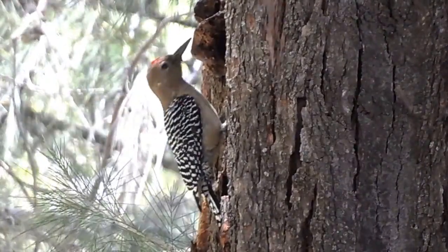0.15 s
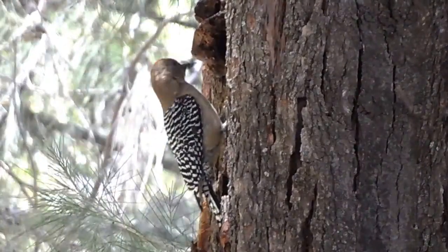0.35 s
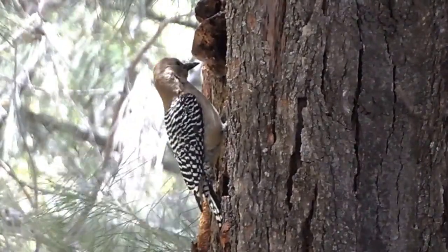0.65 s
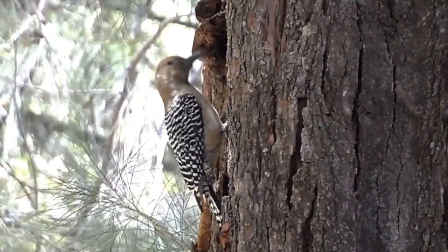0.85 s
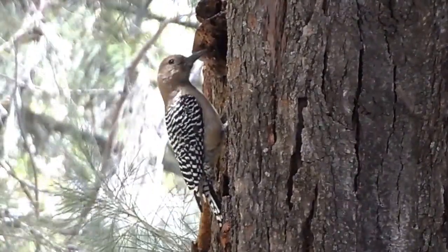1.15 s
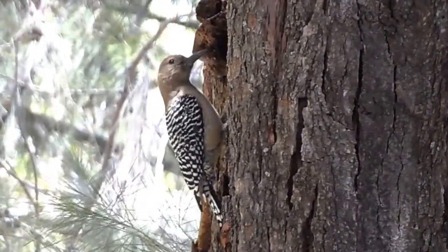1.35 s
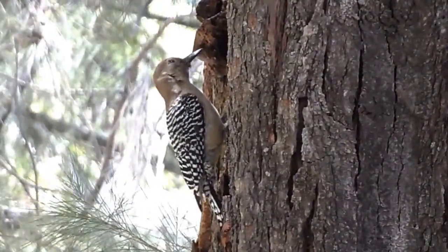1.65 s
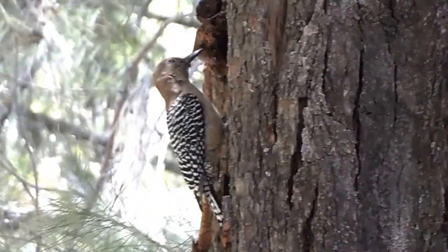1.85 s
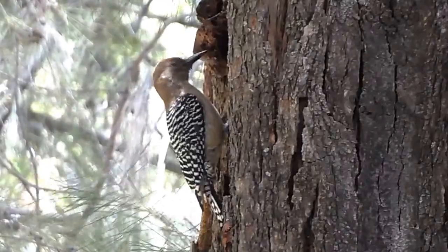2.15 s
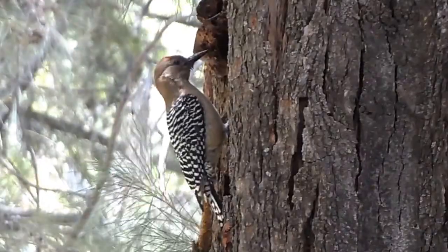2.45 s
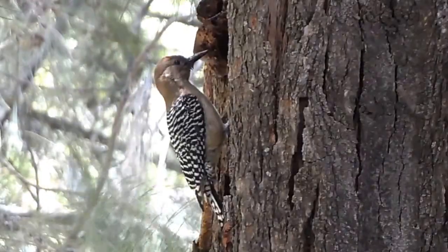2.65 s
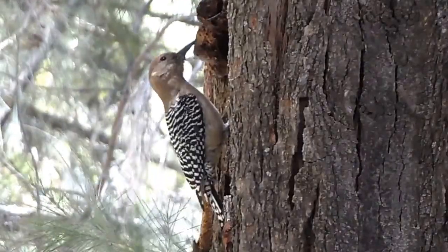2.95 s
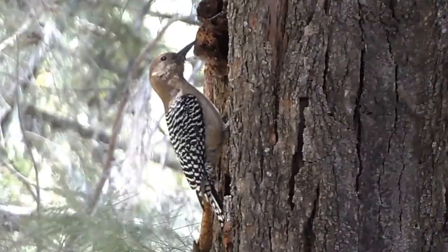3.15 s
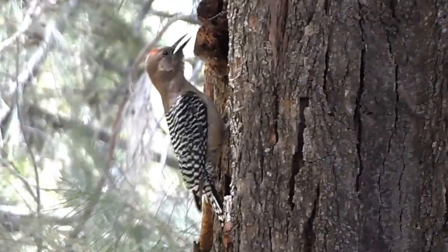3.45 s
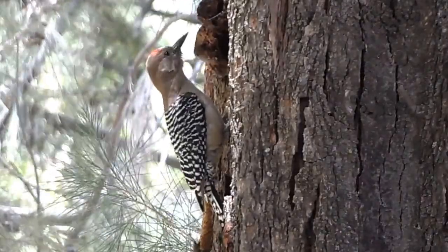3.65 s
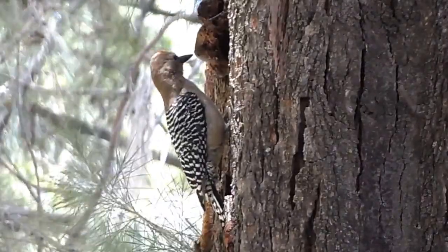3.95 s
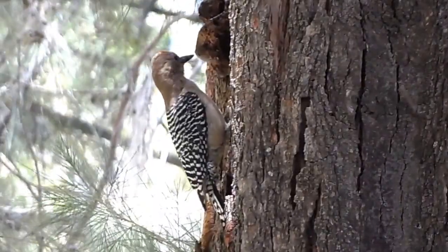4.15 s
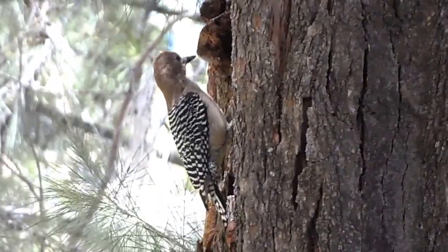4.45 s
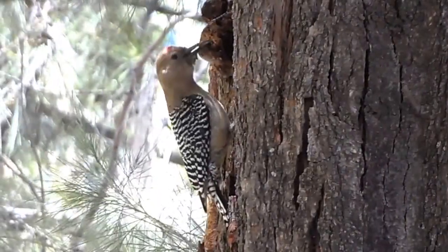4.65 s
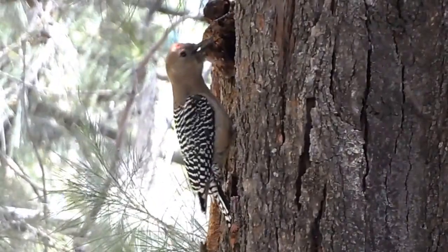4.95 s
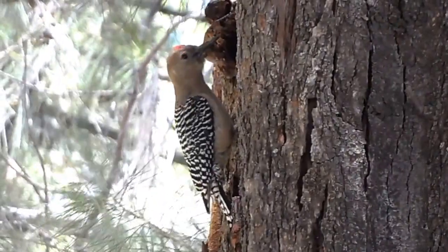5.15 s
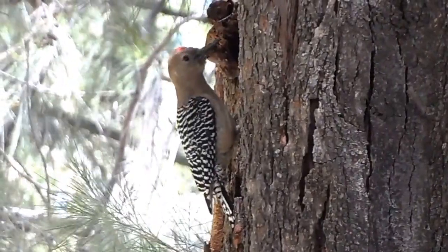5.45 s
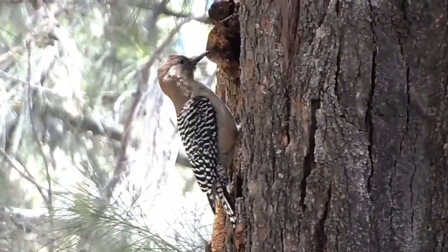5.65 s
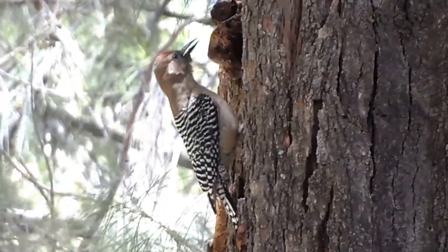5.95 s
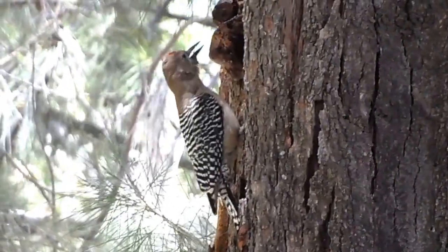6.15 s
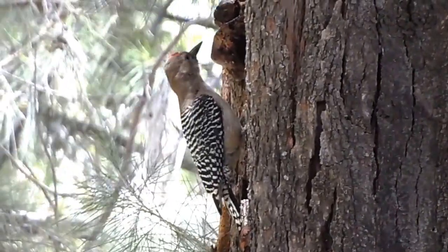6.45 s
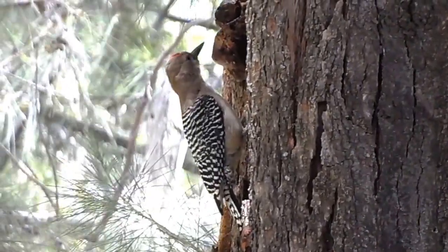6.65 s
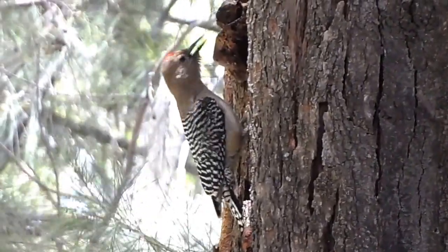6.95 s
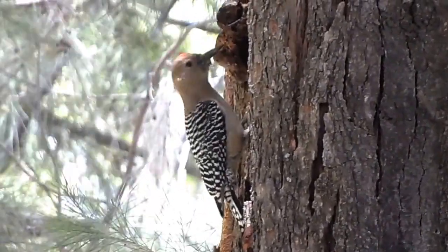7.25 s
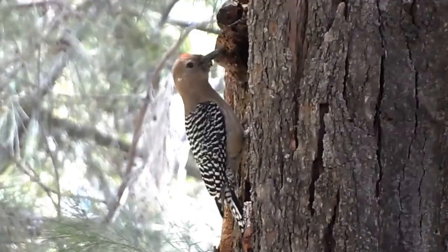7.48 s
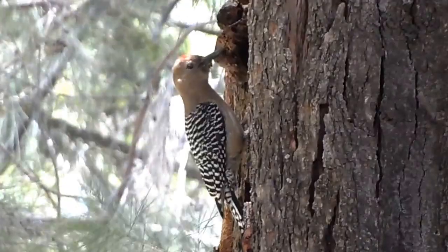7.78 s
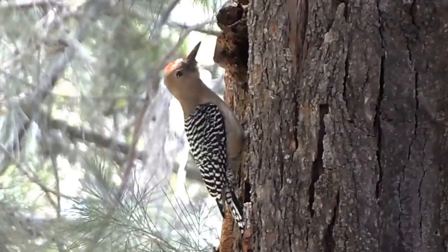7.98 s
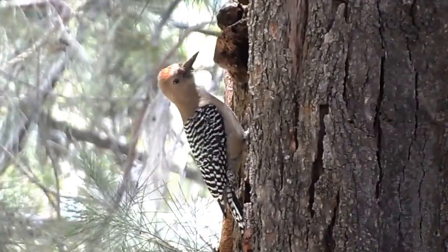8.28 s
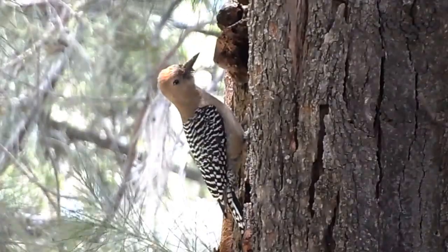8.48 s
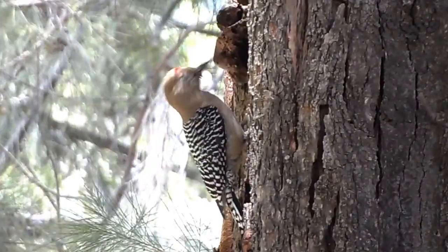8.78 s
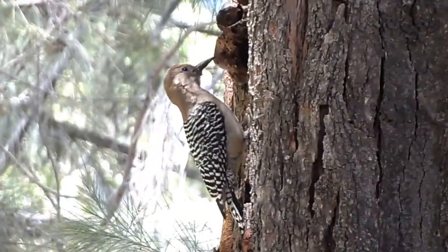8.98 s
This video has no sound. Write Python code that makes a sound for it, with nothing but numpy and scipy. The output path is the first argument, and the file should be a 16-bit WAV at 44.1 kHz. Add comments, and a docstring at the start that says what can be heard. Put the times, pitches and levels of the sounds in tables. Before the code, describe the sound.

A nearby woodpecker taps on a tree trunk, then gives four short quavering calls over faint birdsong and a soft breeze.

```python
"""A woodpecker close by on a pine trunk pecks at the bark, then gives four quavering calls.
Each blow cracks the bark and sets the wood ringing; each call is a warbling buzz from the syrinx,
shaped by the throat and bill. Farther off, small birds whistle, twitter and hoot, and the trees
answer with a short echo. Air hisses steadily in the needles; light gusts rumble on the microphone."""
import sys
import numpy as np
from scipy import signal
from scipy.fft import rfft, irfft, next_fast_len
from scipy.io import wavfile
from scipy.ndimage import uniform_filter1d, map_coordinates

SR = 44100
rng = np.random.default_rng(int(sys.argv[2]) if len(sys.argv) > 2 else 0)


def log_audio(samples):
    """Write samples as a 16-bit WAV file to the path given in sys.argv[1]."""
    # one column per channel
    frames = np.atleast_2d(samples).T
    # limit to full scale, then quantise
    limited = np.clip(frames, -1, 1)
    pcm = np.round(limited * 32767).astype(np.int16)
    wavfile.write(sys.argv[1], SR, pcm)


N = 402191
LEAD_S = 0.008  # the voice starts to swell this long before a call's onset


def amp(db):
    """Decibels to gain."""
    return 10 ** (np.asarray(db) / 20)


def unit(x):
    """Scale to rms 1."""
    return x / np.sqrt(np.mean(x ** 2) + 1e-20)


def along(points, hz):
    """Read (Hz, value) points on a log frequency axis."""
    freqs, values = np.transpose(points)
    return np.interp(np.log(hz + 1), np.log(freqs + 1), values)


def wobble(rate, size):
    """A smooth random curve, rate knots a second."""
    knots = rng.standard_normal(int(size * rate / SR) + 4)
    return map_coordinates(knots, [np.arange(size) * rate / SR])


def ramp(u):
    """A smooth step from 0 to 1."""
    return np.sin(np.pi / 2 * np.clip(u, 0, 1)) ** 2


def filtered(x, response):
    """Filter x by a gain given as a function of Hz."""
    size = next_fast_len(len(x) + 8192)
    return irfft(rfft(x, size) * response(np.fft.rfftfreq(size, 1 / SR)), size)[:len(x)]


def resonate(x, modes):
    """Pass x through parallel (Hz, width in Hz, dB) resonances of alternating sign."""
    def response(f):
        return sum((-1) ** k * amp(db) * 1j * f * width / (hz * hz - f * f + 1j * f * width)
                   for k, (hz, width, db) in enumerate(modes))
    return filtered(x, response)


def noise(spectrum, size):
    """Noise of rms 1, coloured by (Hz, dB) points."""
    return unit(filtered(rng.standard_normal(size), lambda hz: amp(along(spectrum, hz))))


def add(track, start, x):
    """Mix x into the track at start seconds."""
    i = max(round(start * SR), 0)
    track[i:i + len(x)] += x[:len(track[i:])]


def breeze(rush_db=4, hiss_db=-5, rumble_db=-45):
    """Air moving through the needles: a rush and a fine hiss over a steady low rumble."""
    # Strength of the breeze. Each row: time in seconds, level in dB.
    strength = [(0.0, -54.5), (0.12, -52.5), (0.53, -49), (1.19, -48.5), (2.51, -50.5), (3.91, -50),
                (5.28, -48), (6.48, -46.5), (6.81, -48), (8.48, -48.5), (9.12, -50)]
    # Spectra of the three bands. Each row: frequency in Hz, relative density in dB.
    rush_spectrum = [(150, -20), (250, 0), (333, -7), (449, -2), (554, -2.5), (632, -2), (754, -2.5),
                     (842, -0.5), (1060, 1), (1450, 2), (1730, -0.5), (2430, -11), (3500, -20), (4550, -23),
                     (7700, -120)]
    hiss_spectrum = [(1470, -56), (2500, -1), (3620, -2), (4290, -6), (4780, -3), (9570, -9.5),
                     (14100, -11.5), (15800, -13)]
    rumble_spectrum = [(8.8, -36), (15, 2.5), (28, -3.5), (54, -3.5), (119, -8.5), (183, -11), (210, -15.5),
                       (400, -23), (520, -46), (880, -120)]
    breeze_db = np.interp(np.arange(N) / SR, *np.transpose(strength))
    rush = amp(breeze_db + rush_db + 0.45 * wobble(7, N)) * noise(rush_spectrum, N)
    hiss = amp(breeze_db + hiss_db) * noise(hiss_spectrum, N)
    return rush + hiss + amp(rumble_db) * noise(rumble_spectrum, N)


def microphone_gusts(lull_db=-47, lull_swing_db=1.5, eddy_db=-39, eddy_growth=3.0):
    """Wind buffets the microphone; only the strongest gusts shed small, higher-pitched eddies."""
    # Gusts. Each row: time of the peak in seconds, length in seconds, level in dB.
    gusts = [(1.528, 0.052, -35), (1.68, .08, -35.5), (2.183, 0.16, -34), (2.39, 0.11, -33),
             (2.52, .08, -33.5), (2.95, 0.14, -36), (5.573, 0.11, -35), (5.797, 0.042, -35.5),
             (7.392, 0.06, -27), (7.959, .07, -29), (8.214, 0.11, -25), (8.3, 0.6, -36)]
    # Spectra of the buffeting and the eddies. Each row: frequency in Hz, relative density in dB.
    buffet_spectrum = [(10, -5), (25, 0), (55, -1), (90, -8), (160, -22.5), (300, -35.5), (700, -80)]
    eddy_spectrum = [(40, -26), (80, -1), (140, -4), (250, -7), (600, -61)]
    t = np.arange(N) / SR
    gust_power = sum(amp(db) ** 2 * np.exp(-(2 * (t - peak) / length) ** 2) for peak, length, db in gusts)
    lull_power = amp(lull_db + lull_swing_db * wobble(5.7, N)) ** 2
    wind_db = 10 * np.log10(gust_power + lull_power)
    eddies = amp(eddy_db + eddy_growth * (wind_db - wind_db.max())) * noise(eddy_spectrum, N)
    return amp(wind_db) * noise(buffet_spectrum, N) + eddies


def pecks(crack_db=-6, crack_t60=0.071, snap_db=-8, snap_t60=0.0091, ring_db=-10, bloom_s=0.0027):
    """Each blow of the bill snaps the bark at once; the wood under it swells and rings a moment later."""
    # Blows on the trunk. Each row: start in seconds, level in dB, gain of the knock after the snap in dB.
    blows = [(1.1469, -30, -0.5), (1.501, -11.5, -5.5), (1.6706, -25, -1), (1.8931, -33.5, 6.5),
             (2.0519, -41, 6), (2.076, -34.5, 1.5), (2.2907, -32.5, 0.5)]
    # Modes of the wood. Each row: frequency in Hz, relative level in dB, seconds to fall by 60 dB.
    wood_modes = [(328, -15, 0.084), (490, -8, 0.052), (700, -4, 0.051), (1590, -0.5, 0.12),
                  (2210, -3.5, 0.15), (2800, -22, 0.043), (3500, -19, 0.044), (4506, -6, 0.035)]
    # The crack of the bark. Each row: frequency in Hz, relative density in dB.
    crack_spectrum = [(120, -41), (200, -11.5), (599, -4), (1060, -7.5), (1550, -2.5), (1900, -9.5),
                      (2150, -1), (2800, -8), (3400, -11.5), (4640, -9), (10000, -35), (15800, -28)]
    out, t = np.zeros(N), np.arange(SR // 4) / SR
    hardest_db = max(db for _, db, _ in blows)
    for start, db, knock_db in blows:
        wood_db = ring_db + 0.71 * (db - hardest_db)  # light taps hardly stir the wood
        ring = sum(amp(mode_db - 60 * t / t60) * np.sin(2 * np.pi * (hz * t + rng.random()))
                   for hz, mode_db, t60 in wood_modes)
        crack = amp(crack_db - 60 * t / crack_t60) * noise(crack_spectrum, len(t))
        snap = amp(snap_db - 60 * t / snap_t60) * ramp(t / 0.00072) * rng.standard_normal(len(t))
        knock = amp(knock_db) * ramp(t / bloom_s) * (crack + amp(wood_db) * ring)
        add(out, start, amp(db) * (snap + knock))
    return out


def bird_note(hz, db, hoarse_hz, flutter_db=2.0, attack=0.11, release=0.36):
    """A far bird's note on a pitch path; fast pitch scatter makes it hoarse."""
    u = np.linspace(0, 1, len(hz))
    swell = ramp(u / attack) * ramp((1 - u) / release) * amp(db + flutter_db * wobble(51.6, len(u)))
    pitch = hz + hoarse_hz * wobble(700, len(u))
    return swell * np.sin(2 * np.pi * np.cumsum(pitch) / SR)


def wheezes():
    """Long, hoarse cries from far off, each of three partials."""
    # Each row: start and length in seconds, pitch ratio, rise in Hz a second, level in dB,
    # hoarseness in Hz.
    cries = [(1.69, 0.32, 1.08, 1500, -54.5, 380), (2.347, 0.53, 1, -4, -59.5, 250),
             (3.2, 0.68, .99, 0, -58.5, 190)]
    # Partials of a cry. Each row: frequency in Hz at ratio 1, relative level in dB.
    partials = [(2950, 0), (4180, 0), (6000, -3.5)]
    out = np.zeros(N)
    for start, length, ratio, rise, db, hoarse_hz in cries:
        t = np.arange(int(length * SR)) / SR
        for hz, partial_db in partials:
            add(out, start, bird_note(ratio * hz + rise * (t - length / 2), db + partial_db, hoarse_hz))
    return out


def whistles(time_constants=2.5, fade_db=4):
    """Small birds back in the trees whistle notes that glide fast at first and then settle."""
    # Each row: start and length in seconds, first and last pitch in Hz, level in dB, hoarseness in Hz.
    notes = [(1.83, .08, 3190, 2890, -52, 220), (1.907, 0.084, 2860, 3470, -47.5, 164),
             (1.952, 0.052, 3660, 3940, -48.5, 50), (2.235, .04, 3940, 3220, -50, 170),
             (2.367, 0.06, 3090, 3280, -51.5, 130), (2.59, .035, 4100, 3300, -53, 150),
             (3.247, .04, 3860, 3100, -51.5, 66), (5.423, .14, 7400, 7900, -67, 70),
             (6.115, 0.23, 3020, 2400, -47, 330), (6.15, 0.2, 3700, 3290, -50, 90),
             (6.626, 0.28, 4930, 3390, -48.5, 50), (8.524, 0.18, 7270, 7700, -60, 99),
             (8.553, .05, 3130, 2580, -50.5, 30), (8.575, 0.44, 5280, 3940, -48.5, 5)]
    out = np.zeros(N)
    for start, length, first_hz, last_hz, db, hoarse_hz in notes:
        u = np.linspace(0, 1, int(length * SR))
        glide = np.expm1(-time_constants * u) / np.expm1(-time_constants)
        pitch = first_hz + (last_hz - first_hz) * glide
        add(out, start, bird_note(pitch, db + fade_db * (0.5 - u), hoarse_hz))
    return out


def twitter(start=2.019, count=5, step_s=0.0915, note_s=0.04, hz=4980, arch_hz=260, lean_hz=200):
    """One far bird's even run of arched notes; the first leans upward, the last downward."""
    out, u = np.zeros(N), np.linspace(-1, 1, int(note_s * SR))
    for after, lean in zip(step_s * np.arange(count), np.linspace(1, -1, count)):
        pitch = hz - arch_hz * u ** 2 + lean_hz * (lean * u - abs(lean) / 4)
        db = -42.5 - 5 * after  # the run fades by 5 dB a second
        add(out, start + after, bird_note(pitch, db, hoarse_hz=35))
        add(out, start + after + note_s, bird_note(pitch, db - 9, hoarse_hz=35))  # each note echoes back softer from the trees
    return out


def bark_ticks(t60=0.035, width_hz=3000, patter_count=14, patter_db=-51):
    """Tiny flakes of bark click under bill and claws, with a faint patter as the bird shifts its grip."""
    # Dry ticks. Each row: start in seconds, level in dB, resonance in Hz.
    ticks = [(2.472, -44, 13500), (2.900, -47, 12000), (2.952, -47, 14000), (2.980, -34.5, 14600),
             (3.090, -47, 7200), (3.405, -48, 13000), (4.265, -51, 12400), (4.505, -50, 14000),
             (5.939, -45, 7400), (6.185, -47, 11000), (7.528, -44.5, 8950), (9.002, -44.5, 7970)]
    patter = rng.uniform((7.6, patter_db - 4, 6000), (9.1, patter_db + 4, 14000), (patter_count, 3))
    out, t = np.zeros(N), np.arange(SR // 16) / SR
    for start, db, hz in [*ticks, *patter]:
        flake = unit(resonate(rng.standard_normal(len(t)), [(hz, width_hz, 0)]))
        add(out, start, amp(db - 60 * t / t60) * flake)
    return out


def hoots(sag_hz_per_s=710):
    """Low hoots in the distance, each falling in pitch."""
    # Each row: start and length in seconds, first pitch in Hz, level in dB.
    notes = [(2.942, .21, 995, -48.5), (3.417, .14, 935, -48), (4.938, .14, 965, -50.5),
             (5.37, .155, 905, -51), (7.622, .24, 1010, -52), (8.17, .091, 905, -49.5)]
    out = np.zeros(N)
    for start, length, hz, db in notes:
        t = np.arange(int(length * SR)) / SR
        add(out, start, bird_note(hz - sag_hz_per_s * t, db, hoarse_hz=10))
    return out


def squeak(hz, db, glide, span_s, roughness=0.081):
    """The rough squeak of the syrinx snapping open or shut, 40 ms with its peak in the middle."""
    t = np.arange(-(SR // 50), SR // 50) / SR
    pitch = hz * (1 + glide * np.tanh(t / span_s)) * (1 + roughness * wobble(1446, len(t)))
    return amp(db) * np.exp(-np.abs(t) / span_s) * np.sin(2 * np.pi * np.cumsum(pitch) / SR)


def warble(t, depth, base_hz=1480.7, scoop_hz=423.4, scoop_s=0.00342, swing_s=0.0418):
    """A call's pitch path: it scoops up to a held note, then swings up three times at a steady rate."""
    # Heights over the base pitch in Hz at depth 1: the held note, each warble, the dying end.
    swings_hz = [96.7, 333, 409, 341, 150]
    turn = np.maximum(t - 0.0045, 0) / swing_s
    height = depth * np.take(swings_hz, turn.astype(int), mode="clip")
    sharpness = np.where(turn < 1, 0.5, 1.6)  # the held note has a flatter top
    lift = height * np.abs(np.sin(np.pi * turn)) ** sharpness
    scoop = scoop_hz * np.exp(-np.maximum(t, 0) / scoop_s)
    return base_hz + lift - scoop


def effort(t, length, rise_s=0.022, hold_s=0.036, ebb_db_per_s=30, push_s=0.1084, release_s=0.01):
    """The bird's effort as a gain: it holds, then ebbs, with a 1 dB push on the highest warble."""
    ebb_db = ebb_db_per_s * np.maximum(t - hold_s, 0)
    push_db = np.exp(-((t - push_s) / 0.0069) ** 2)
    return amp(push_db - ebb_db) * ramp((t + LEAD_S) / rise_s) * ramp((length - t) / release_s)


def syrinx(ratio, depth, length, harmonics=12, rasp_db=-20, flutter_db=3.5, harsh_db=4):
    """The source of one call: a warbling buzz with a full row of harmonics and a growing rasp."""
    t = np.arange(SR // 4) / SR - LEAD_S
    k = np.arange(1, harmonics + 1)[:, None]
    hz = ratio * uniform_filter1d(warble(t, depth), size=150)
    falling = ramp(-np.gradient(hz) * SR / 25000)  # the voice turns harsh whenever the pitch tumbles
    # the held note is steady; the warbles shake, which frays the high harmonics into noise
    jitter = 0.005 + 0.014 * ramp((t - 0.035) / 0.04)
    hz = hz * (1 + jitter * wobble(1200, len(t)))
    flutter = np.array([wobble(183, len(t)) for _ in k])  # each upper harmonic flutters in its own way
    weight = amp(ramp((k - 1) / 3) * (flutter_db * flutter + harsh_db * falling)) * (k * hz < SR / 2)
    buzz = np.sqrt(2) * np.sum(weight * np.sin(2 * np.pi * k * np.cumsum(hz) / SR), axis=0)
    rasp_spectrum = [(1500, -5), (5000, 1), (7000, 18), (9000, -10), (14000, -18)]
    rasp = amp(rasp_db) * np.sqrt(harmonics) * noise(rasp_spectrum, len(t))
    return effort(t, length) * (buzz + rasp * ramp(t / 0.033))


def calls(bill_width_hz=1100, bill_db=-41, top_hz=14700, top_width_hz=800, break_s=0.009):
    """Harmonics flare as the warble sweeps them through resonances; a squeak opens and shuts each call."""
    # The woodpecker's calls. Each row: onset in seconds, pitch ratio, warble depth, length in seconds,
    # gain in dB, treble tilt in dB, bill resonance in Hz, top resonance in dB, closing squeak in dB.
    cries = [(3.649, 0.97, 1.08, 0.17, -2, 2, 12000, -50, -30.5),
             (5.071, 1.036, 0.93, 0.19, -0.5, 4, 11800, -41, -27),
             (6.294, 0.97, 1.0, 0.181, -1.5, -1, 11400, -46, -30.5),
             (7.22, 0.985, 1.09, 0.19, 0.5, 3, 11300, -44, -31.5)]
    # Resonances of windpipe and throat, and the hollows between them.
    # Each row: centre in Hz, width in Hz, gain in dB.
    throat = [(1934, 198, -19), (3254, 560, -33.5), (4570, 250, -38), (5500, 740, -42), (7260, 1970, -39.5)]
    hollows = [(2460, 370, -2), (4806, 350, -12.5), (6070, 130, -8.5), (8670, 930, -14),
               (10260, 780, -12.5), (14200, 200, -9)]

    def hollows_db(f):
        return sum(db * np.exp(-((f - hz) / width) ** 2) for hz, width, db in hollows)

    out = np.zeros(N)
    for start, ratio, depth, length, db, tilt_db, bill_hz, top_db, shut_db in cries:
        tract = [*throat, (bill_hz, bill_width_hz, bill_db), (top_hz, top_width_hz, top_db)]
        voice = resonate(syrinx(ratio, depth, length - break_s), tract)
        voice = filtered(voice, lambda f: amp(hollows_db(f) + along([(2500, 0), (12000, tilt_db)], f)))
        add(out, start - LEAD_S, amp(db) * voice)
        opening = squeak(hz=2050, db=-21, glide=0.06, span_s=0.0026)
        closing = squeak(hz=2430, db=shut_db, glide=-0.06, span_s=0.0042)
        for peak, sound in (start, opening), (start + length, closing):
            add(out, peak - len(sound) / SR / 2, sound)
    return out


def branches(x, latest_s=0.025, count=12):
    """A few quick reflections from nearby trunks and limbs."""
    echoes = np.zeros(SR // 4)
    for delay, gain in zip(rng.uniform(0.0024, latest_s, count), rng.standard_normal(count)):
        echoes[int(delay * SR)] += gain
    return signal.fftconvolve(x, echoes / np.linalg.norm(echoes))[:N]


def grove(x):
    """The diffuse answer of the trees; each frequency dies at its own speed."""
    # Decay among the trees. Each row: frequency in Hz, seconds to fall by 60 dB.
    decay_times = [(300, 0.27), (1800, 0.33), (3000, 0.51), (6800, 0.34), (10000, 0.36), (15000, 0.046)]
    hz, t, spectra = signal.stft(rng.standard_normal(SR // 2), SR, nperseg=256)
    decay = amp(-60 * t / along(decay_times, hz)[:, None])
    _, tail = signal.istft(spectra * decay, SR, nperseg=256)
    return signal.fftconvolve(x, tail / np.linalg.norm(tail))[:N]


def scene():
    """One microphone near the pine: the woodpecker is mostly dry, the far birds are bathed in echo."""
    # The trees scatter back mostly the treble of a call. Each row: frequency in Hz, gain in dB.
    scatter = [(1800, -13), (3200, -13), (5000, -9.5), (6800, -4.5), (9000, -8.5), (15000, -9.5)]
    voice = calls()
    bark = pecks() + bark_ticks()
    far_birds = wheezes() + whistles() + twitter() + hoots()
    voice_echo = amp(-13) * branches(voice) + filtered(grove(voice), lambda hz: amp(along(scatter, hz)))
    woodpecker = voice + voice_echo + bark + amp(-14) * grove(bark)
    songs = far_birds + amp(-5.5) * grove(far_birds)
    return (woodpecker + songs + breeze() + microphone_gusts())[None]


def record(dry, top_hz=15850):
    """The camera keeps nothing above its band limit."""
    return np.array([filtered(channel, lambda hz: hz < top_hz) for channel in dry])


dry = scene()
out = record(dry)
log_audio(out)
```